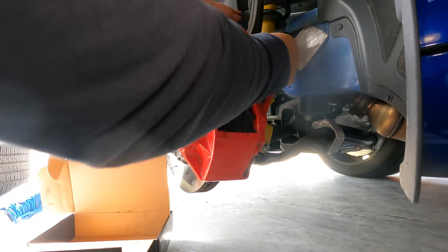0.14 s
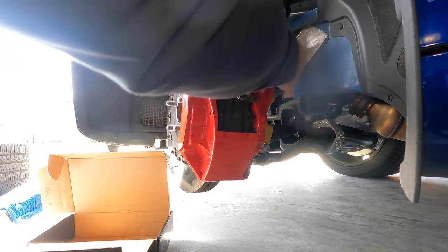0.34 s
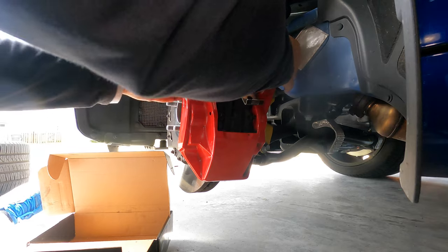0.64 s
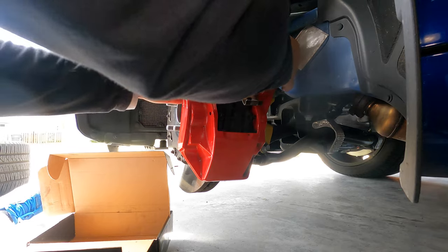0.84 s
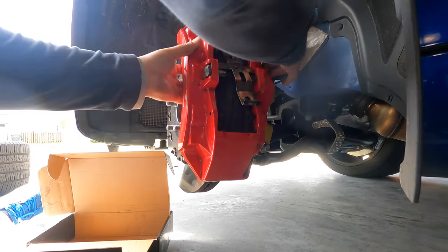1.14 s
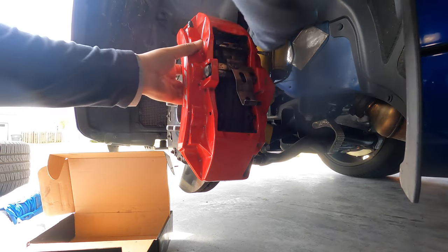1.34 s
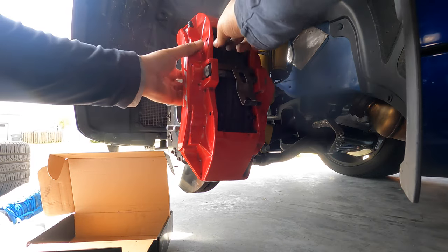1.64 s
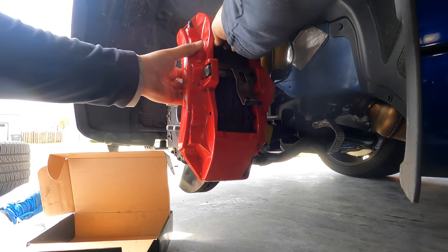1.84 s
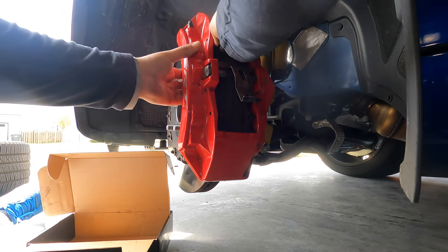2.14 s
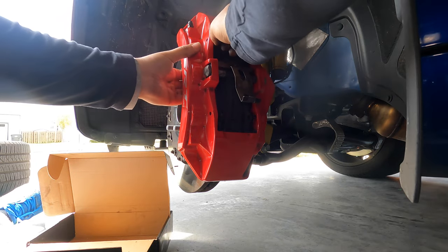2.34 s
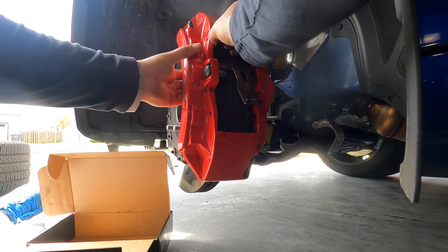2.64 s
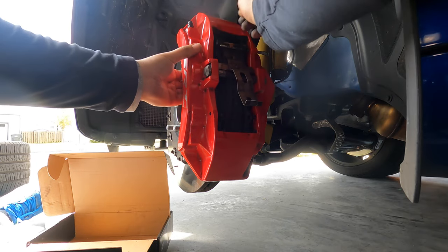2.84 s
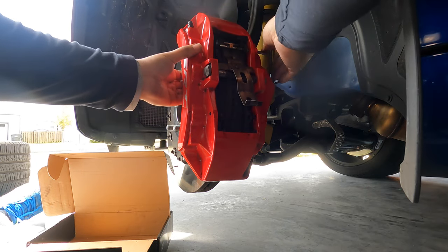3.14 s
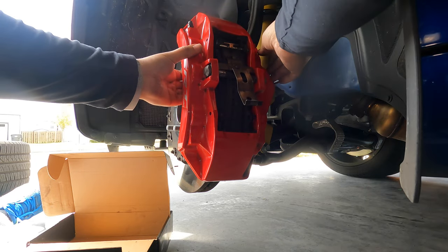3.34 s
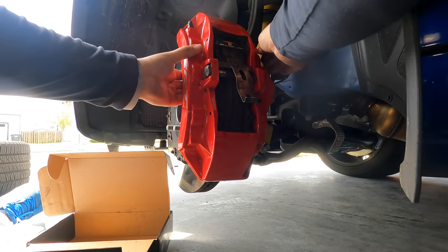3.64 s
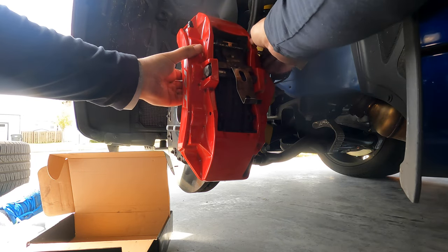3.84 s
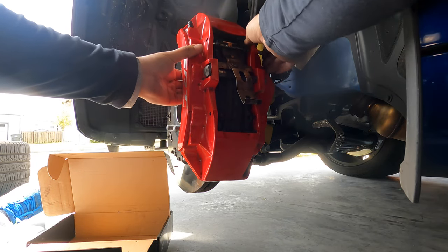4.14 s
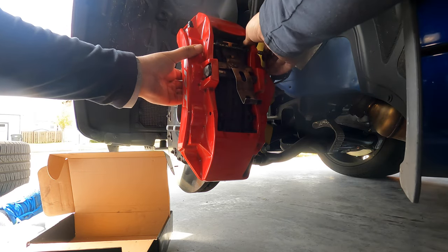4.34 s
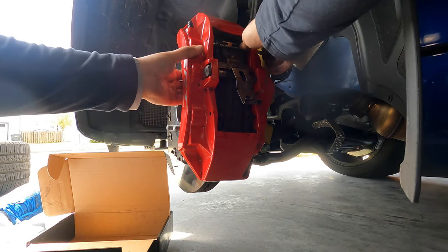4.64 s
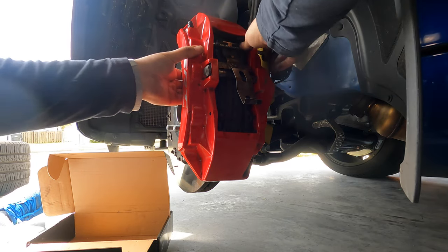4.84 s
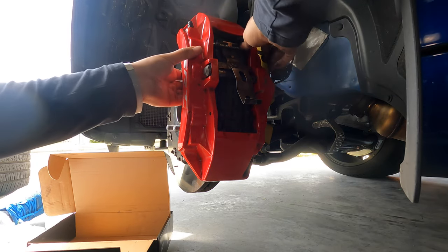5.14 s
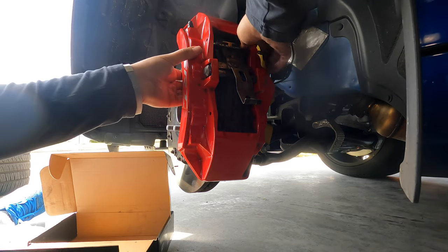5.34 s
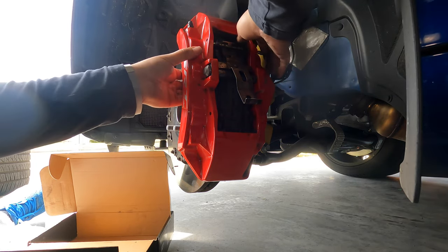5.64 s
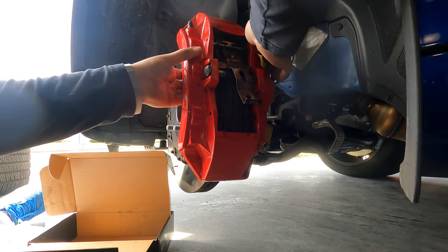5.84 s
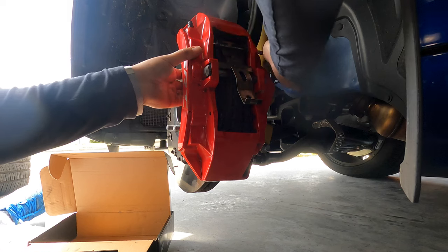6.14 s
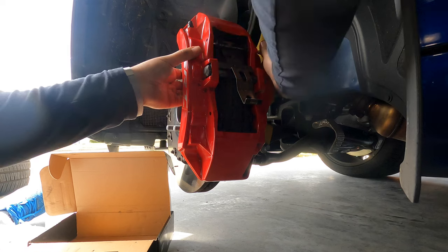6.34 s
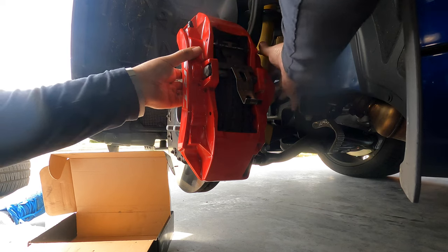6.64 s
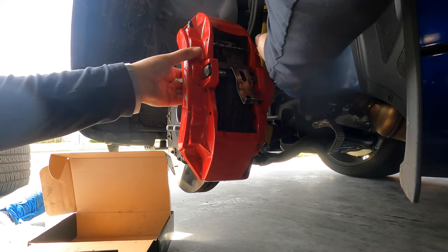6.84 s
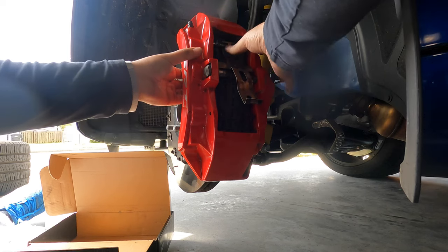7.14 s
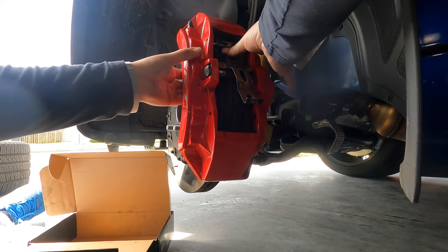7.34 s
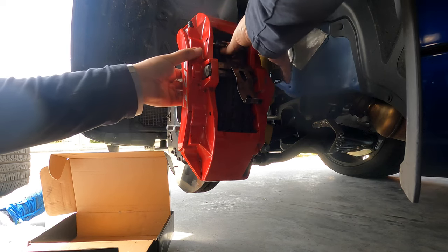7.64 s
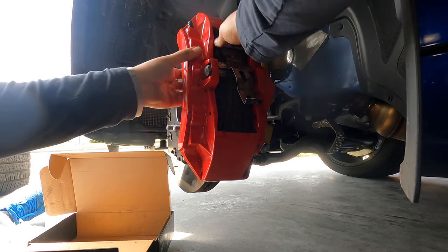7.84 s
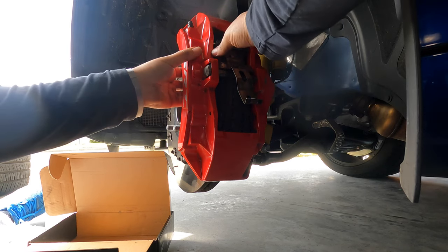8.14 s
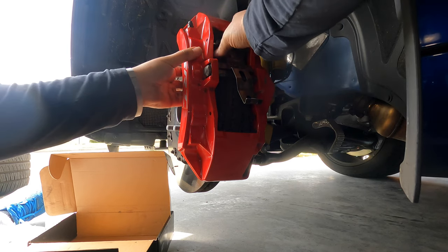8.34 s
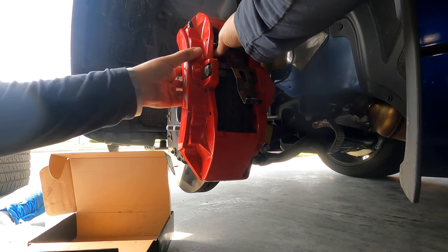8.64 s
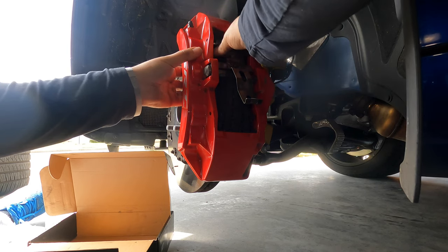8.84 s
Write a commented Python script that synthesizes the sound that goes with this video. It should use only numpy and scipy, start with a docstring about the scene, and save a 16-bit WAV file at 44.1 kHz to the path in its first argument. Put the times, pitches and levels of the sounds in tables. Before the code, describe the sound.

Close metallic work on a brake caliper in an open, echoing garage, over soft low rumble, a distant airy rush and a wavering low motor hum. A faint tick at 0.3 s leads into grating clacks from 0.45 to 0.75 s, loudest near 0.57, with thin steel ringing. A light scuff follows at 0.9, taps at 1.4 and 1.6, a crisp double click around 2.28, small clicks at 2.5 and 2.9. The hum stops by about 2.7. Sharp knocks and clinks burst out at 3.73-3.92, the last hardest, with a smaller click at 4.19; the rush sinks away. Very faint thin whistles pass at 4.2 and 4.8. A stuttering, gritty rasp runs 5.2-5.5, then tiny ticks fade to 5.9. Sparse faint taps and scuffs continue, with a clear tap at 6.97, dull plastic bumps with cloth rub at 7.2 and 7.4, and a final bright click at 7.9. Then only faint rumble and drone.

```python
"""Brake pads and a retaining pin are worked into a caliper under a wheel arch, in an open garage.
Each contact is a noisy push that grates or cracks; firm ones ring pad, pin, clip and suspension as modes.
A part rasps along an edge in noise bursts, an arm bumps the arch liner in coloured noise, thin tones whistle.
The arch and garage echo the work; behind lie noise rumble, a distant rush that sinks away, a hum that stops
and a faint steady drone."""
import sys
import numpy as np
from scipy import signal
from scipy.fft import rfft, irfft
from scipy.io import wavfile
from scipy.ndimage import uniform_filter1d

SR = 44100
rng = np.random.default_rng(int(sys.argv[2]) if len(sys.argv) > 2 else 0)


def digitize_waveform(pressure):
    """Quantize a signal to 16-bit integers and store it at the path in sys.argv[1].

    Rows of a 2-D input are taken as channels; values are limited to [-1, 1].
    """
    field = np.atleast_2d(pressure).T
    bounded = np.clip(field, -1, 1)
    quanta = np.round(bounded * 32767).astype(np.int16)
    wavfile.write(sys.argv[1], SR, quanta)


N = 396018
T = np.arange(N) / SR
LEAD_S = 0.1  # room for a contact's rise ahead of its peak

# the dull crack of a light touch, relative levels: frequency_hz [Hz], density_db [dB per Hz]
TICK = [(100, -28), (550, -7), (1000, -1.5), (2200, 3.5), (3400, -1.5), (4400, -5), (6800, -10),
        (8000, -27.5), (10300, -18.5), (12500, -34), (15000, -40.5)]


def clinks(strut_db=-33, spring_db=-23.5, grip_s=0.011):
    """Firm contacts also set the pin, the spring clip and the suspension ringing, until the fingers mute them."""
    # firm metal contacts; rings are relative to the contact's level, the pad's before a common lift:
    # peak_s [s], level_db [dB], rise_ms [ms], fall_ms [ms], pad_ring_db [dB], pin_ring_db [dB], spot_hz [Hz]
    contacts = [ (.449, -19, 7.8, 23, -10, -22.5, 2184), (.485, -21.5, 4, 7.2, 2.5, -26.5, 5870),
                (.494, -26, 2, 9, -2.5, -24.5, 4840), (.549, -35, 3.2, 24, 0.5, -3, 5020),
                (.572, -11.5, .4, 11.8, -12, -29, 3627), (.598, -36, 2.1, 85, -8.5, -15, 2280),
                (.716, -33.5, 15, 31, -6.5, -21, 1560), (.742, -40.5, 3, 3.5, 5, -13.5, 3330),
                (1.968, -57.5, 0.9, 4, 7, -25, 3190), (2.265, -40.5, 1.7, 7.7, 3, -16, 3360),
                (2.282, -26.5, 0.87, 3.4, 2, -28, 3100), (2.2894, -24.5, .8, 4.1, -8, -19.5, 1804),
                (2.604, -41.5, 1.5, 5.6, -1, -16, 3353), (2.917, -32.5, 2, 11, -5, -18, 3850),
                (2.925, -33, 1.2, 2.2, 1.5, -22, 4640), (3.748, -29, 1.5, 3.4, 0.5, -26, 2190),
                (3.7552, -19.5, 0.34, 3.7, 5.5, -25.5, 3353), (3.765, -17, 1.3, 4.2, -1, -29.5, 2203),
                (3.9, -22, 1.3, 5.8, -1, -27, 4200), (3.9087, -11, 0.33, 3.3, -9.5, -23.5, 3804),
                (3.9165, -22.5, .5, 4.1, -8.5, -23.5, 2312), (4.181, -39, 0.62, 3.6, -2.5, -23, 3353),
                (4.1864, -29.5, 0.55, 2.4, -6, -32, 3780), (4.674, -39, 0.44, 3.4, -13, -29, 3300),
                (5.681, -56, 0.96, 7.2, -3, -28, 3440), (6.178, -49, 1.1, 11.5, -19, -19, 3790),
                (7.164, -45, 1.6, 11, -8, -10, 5070), (7.897, -28, 1.35, 1.6, -7, -28, 6170),
                (7.918, -39, 2.6, 3.9, -7, -23, 3470)]
    # crack of a firm contact, relative levels: frequency_hz [Hz], density_db [dB per Hz]
    crack_colour = [(100, -24), (550, -14), (900, -3.5), (1400, -6.5), (2300, 2), (2800, -2.5), (3500, 2),
                    (4300, -2.5), (5400, -6.5), (6100, -4.5), (7800, -19.5), (10300, -19), (12500, -39),
                    (15000, -44.5)]
    # ringing parts, relative levels, in each: frequency_hz [Hz], level_db [dB], t60_s [s]
    pin_modes = [(2295, -9, 0.26), (2710, -16.5, 0.67), (5020, 6, 0.32), (6660, -19, 0.18),
                 (9000, -31.5, 0.16), (11970, -26, 0.14), (12150, -29, .13)]  # the thin steel pin
    spring_modes = [(2450, -14, .25), (3670, -14, .3), (4120, -14, .28), (6260, 0.5, 0.36),
                    (7538, -13.5, 0.36), (11000, -26, .25), (11900, -21, 0.22), (12340, -24.5, .2)]  # the spring clip
    strut_modes = [(172.3, -4.5, 0.26), (195.5, -2.5, 0.84), (233, 0, 0.34), (283, -5.5, .3),
                   (333, -4, 0.44)]  # the suspension behind the caliper
    # moments when the fingers press on the ringing steel: grip_s [s]
    grips = [.565, 2.96, 3.893, 4.28]
    # level and fall time that leave the colour untilted
    neutral_db, neutral_ms = -22, 6
    brighten = 0.11  # dB/octave gained per dB of level
    dulling_db = 0.9  # dB/octave lost per doubling of the fall time
    out = np.zeros(N)
    for s, db, rise_ms, fall_ms, pad_db, pin_db, spot_hz in contacts:
        harder = brighten * (db - neutral_db)
        longer = dulling_db * np.log2(fall_ms / neutral_ms)
        force, sound = contact(crack_colour, rise_ms, fall_ms, harder - longer, pad_db)
        # a longer push moves the heavy suspension more
        thump_db = strut_db + 10 * np.log10(2 * rise_ms + fall_ms)
        sound = sound + ring(force, spot_mode(spot_hz))
        for modes, ring_db in (pin_modes, pin_db), (spring_modes, spring_db), (strut_modes, thump_db):
            sound = sound + undb(ring_db) * ring(force, modes)
        next_grip = min([g for g in grips if g > s], default=T[-1])
        clock = s - LEAD_S + np.arange(len(sound)) / SR
        held = np.maximum(clock - next_grip, 0)
        add(out, s - LEAD_S, undb(db) * sound * np.exp(-held / grip_s))
    return out


def contact(spectrum, rise_ms, fall_ms, bright_db, pad_db, grit_db=1.6, snap=6.3, snap_ms=0.56,
            casting_db=-2, casting_t60=0.042, crack_db=-0.5, pad_lift_db=5.0):
    """Steel grates up to a peak and chatters out: the force, and the crack and short rings that it makes."""
    # the pad's backing plate, damped by its lining, relative levels:
    # frequency_hz [Hz], level_db [dB], t60_s [s]
    pad_modes = [(1123, -20, 0.04), (1800, -20.5, 0.079), (2237, -13.5, 0.13), (3320, -5.5, 0.11),
                 (3355, 2, 0.021), (3430, -5.5, 0.041), (3680, -13.5, 0.055), (4060, -19, 0.04),
                 (5933, -15.5, 0.041), (7020, -23.5, 0.13), (10650, -28, 0.048), (11900, -33, .035)]
    ms = 1000 * (np.arange(30000) / SR - LEAD_S)
    log_force = np.where(ms < 0, -0.5 * (ms / rise_ms) ** 2, -ms / fall_ms)
    force = np.exp(np.maximum(log_force, -60))
    # rough faces catch unevenly, about once a millisecond
    catches = np.repeat(rng.standard_normal(len(ms) // 40), 40)
    grit = unit(undb(grit_db * catches))
    push = force * grit * rng.standard_normal(len(ms))
    # an abrupt contact starts with one hard impact
    push[int(LEAD_S * SR)] -= snap * np.exp(-rise_ms / snap_ms)
    crack = colour(push, spectrum, bright_db)
    # each spot of the caliper casting answers with its own set of short modes
    hz = 1000 + 440 * (np.arange(16) + rng.random(16))
    mode_db = between(hz, spectrum) + bright_db * np.log2(hz / 3000)
    mode_db = mode_db - 10 * np.log10(np.sum(undb(mode_db) ** 2))
    casting = ring(force, [(f, db, casting_t60) for f, db in zip(hz, mode_db)])
    # the pad's pitch shifts a little with how it is wedged
    wedged = np.array(pad_modes) * [1 + 0.004 * rng.standard_normal(), 1, 1]
    pad = ring(force, wedged)
    sound = undb(crack_db) * crack + undb(casting_db) * casting + undb(pad_db + pad_lift_db) * pad
    return force, sound


def spot_mode(hz, level_db=-2.5, cycles=210):
    """The mode that a struck spot brings out dies by 60 dB in a set number of cycles, so higher ones die sooner."""
    return [(hz, level_db, cycles / hz)]


def taps(rise_ms=0.3, pad_db=-16.5, spot_db=-3):
    """Light taps on parts held still by the fingers: only the casting, the pad and the struck spot answer."""
    # peak_s [s], level_db [dB], fall_ms [ms], brightness_db [dB/octave], spot_hz [Hz]
    touches = [(.305, -48.5, 5, 0.5, 5300), (1.385, -36, 3.8, 0, 3360), (1.626, -41, 16, -4.5, 2170),
               (2.467, -42, 5.2, 0, 3280), (3.577, -51, 8, 2.5, 3350), (3.733, -30, 2.1, 2.5, 3900),
               (5.518, -36.5, 4, -2, 3880), (5.833, -51.5, 6.1, 1.5, 2180), (6.146, -44.5, 16, -3, 2220),
               (6.213, -43.5, 7, -5, 2575), (6.468, -50, 7, 8.5, 7170), (6.9699, -25, 2.6, -3, 2390),
               (7.065, -50, 5.6, 0, 6060), (7.411, -36, 2.4, -3, 2270)]
    out = np.zeros(N)
    for s, db, fall_ms, bright_db, spot_hz in touches:
        force, sound = contact(TICK, rise_ms, fall_ms, bright_db, pad_db, casting_db=-7.5)
        spot = undb(spot_db) * ring(force, spot_mode(spot_hz))
        add(out, s - LEAD_S, undb(db) * (sound + spot))
    return out


def scuffs(fade_ratio=1.76, pad_db=-11.5):
    """Metal sliding lightly on metal swells, then fades over a time in proportion to the swell."""
    # peak_s [s], level_db [dB], swell_ms [ms], brightness_db [dB/octave]
    slides = [(.865, -43.5, 42, -5), (1.355, -49.5, 24.5, 3), (3.285, -53.5, 23, 1.5), (3.72, -40, 6, 1.5),
              (6.409, -51.5, 9, -1.5), (6.831, -49.5, 28, 0.5), (6.953, -43.5, 6.6, -10),
              (7.503, -40, 9, -3.5)]
    out = np.zeros(N)
    for s, db, swell_ms, bright_db in slides:
        _, sound = contact(TICK, swell_ms, fade_ratio * swell_ms, bright_db, pad_db)
        add(out, s - LEAD_S, undb(db) * sound)
    return out


def rasp(slip_db=-4.5, lesser_db=5.0, scatter_db=0.5, snap=2.8, grain_db=3):
    """A part dragged over an edge sticks and slips, harder as it is pressed, with fine grating in between."""
    # strokes along the edge, levels before colouring: full_pressure_s [s], hold_s [s], level_db [dB]
    strokes = [(4.778, 0.036, -55.5), (4.845, 0.3, -61), (5.283, 0.13, -37)]
    # the hardest slips, before slip_db and colouring: slip_s [s], level_db [dB]
    slips = [(5.2515, -22), (5.2672, -26.5), (5.2755, -23.5), (5.3489, -17), (5.3748, -22.5),
             (5.3936, -19.5), (5.4439, -21.5)]
    # the rasp's relative spectrum: frequency_hz [Hz], density_db [dB per Hz]
    rasp_colour = [(240, -19), (400, -2), (1100, -4.5), (1600, 2.5), (2200, 5), (2800, 4), (3500, 5.5),
                   (4200, -2.5), (7100, -9.5), (8800, -21.5), (10300, -17), (12500, -45), (15000, -42)]
    rise_db_per_s, fall_db_per_s = 290, 280
    slip_fall_ms, slip_gap_s = 3.1, 0.012  # the gap is the lesser slips' mean spacing
    pressure = sum(swell(*stroke, rise_db_per_s, fall_db_per_s) for stroke in strokes)
    # lesser slips follow the pressure from the last stroke on
    start, _, _ = strokes[-1]
    chance = rng.standard_normal((16, 2))
    times = start + slip_gap_s * (np.arange(len(chance)) + 0.3 * chance[:, 0])
    sizes = np.interp(times, T, pressure) * undb(lesser_db + scatter_db * chance[:, 1])
    hardest = [(s, undb(db + slip_db)) for s, db in slips]
    grain = unit(rng.standard_normal(N) * undb(grain_db * walk(700)))
    pushes = pressure * grain
    ms = 1000 * np.arange(2000) / SR
    for s, size in hardest + list(zip(times, sizes)):
        slip = np.exp(-ms / slip_fall_ms) * rng.standard_normal(len(ms))
        slip[0] = -snap
        add(pushes, s, size * slip)
    return colour(pushes, rasp_colour)


def settling(count=8, rise_ms=4, fall_ms=11, bright_db=-3, scatter_db=2, pad_db=-10):
    """After the rasp the part finds its seat in uneven small ticks, each of its own colour, growing fainter."""
    start_s, gap_s, start_db, fade_db_per_s = 5.556, 0.042, -47.5, 29
    out = np.zeros(N)
    for k, (shift, strength, tint) in enumerate(rng.standard_normal((count, 3))):
        after = gap_s * (k + 0.17 * shift)
        db = start_db - fade_db_per_s * after + scatter_db * strength
        _, sound = contact(TICK, rise_ms, fall_ms, bright_db + scatter_db * tint, pad_db)
        add(out, start_s + after - LEAD_S, undb(db) * sound)
    return out


def arm(flutter_db=1.0):
    """The arm leans on the plastic liner, which booms while the sleeve rubs along it."""
    # bumps on the liner: full_s [s], boom_db [dB], rub_db [dB]
    bumps = [(7.198, -41, -56.5), (7.396, -32.5, -42)]
    # relative spectra, in each: frequency_hz [Hz], density_db [dB per Hz]
    liner_colour = [(24, -52.5), (40, -19.5), (92, -5.5), (193, 0), (220, 0), (357, -5), (434, -12),
                    (521, -13), (650, -22), (900, -13), (1170, -46), (1980, -120)]  # the booming plastic
    sleeve_colour = [(300, -2.5), (600, 3), (1500, 3), (2500, -3.5), (4000, -9.5), (6500, -24.5),
                     (8500, -47), (14000, -57)]  # the rubbing cloth
    rise_db_per_s, hold_s = 1402, 0.02
    boom_fall_db_per_s, rub_fall_db_per_s = 70, 40.5
    boom = sum(swell(s, hold_s, db, rise_db_per_s, boom_fall_db_per_s) for s, db, _ in bumps)
    rub = sum(swell(s, hold_s, db, rise_db_per_s, rub_fall_db_per_s) for s, _, db in bumps)
    flutter = undb(flutter_db * walk(90))
    return boom * noise(liner_colour) + rub * flutter * noise(sleeve_colour)


def whistles(waver_hz=60):
    """Faint sine tones glide and waver in pitch while they swell and fade."""
    # start_s [s], length_s [s], start_hz [Hz], end_hz [Hz], peak_db [dB]
    tones = [(4.225, 0.11, 3710, 3600, -63), (4.249, .3, 4330, 4340, -70.5), (4.816, 0.33, 2890, 3100, -64)]
    out = np.zeros(N)
    for s, length, start_hz, end_hz, db in tones:
        along = np.clip((T - s) / length, 0, 1)
        hz = start_hz + (end_hz - start_hz) * along + waver_hz * walk(60)
        out += undb(db) * np.sin(np.pi * along) * np.sin(2 * np.pi * np.cumsum(hz) / SR)
    return out


def echoes(dry, arch_db=-12, arch_t60=0.11, room_db=-14, build_s=0.0026):
    """Quick reflections inside the wheel arch, then the garage's longer tail, as decaying noise."""
    # the garage's decay: frequency_hz [Hz], t60_s [s]
    room_decay = [(150, 0.19), (500, 1), (1500, 0.39), (3500, 0.43), (7000, .45), (13000, 0.44)]
    t = np.arange(SR) / SR
    hz = np.fft.rfftfreq(SR, 1 / SR)
    white, tail = rfft(rng.standard_normal(SR)), 0
    centres, t60s = np.transpose(room_decay)
    # overlapping bands, each dying at its own rate
    for share, t60 in zip(np.eye(len(centres)), t60s):
        band = irfft(white * between(hz, np.c_[centres, share]), SR)
        tail = tail + band * np.exp(-np.log(1000) * t / t60)
    tail = tail * (1 - np.exp(-t / build_s))
    arch = rng.standard_normal(SR) * np.exp(-np.log(1000) * t / arch_t60) * (t > 0.002)
    response = (undb(arch_db) * unit(arch) + undb(room_db) * unit(tail)) / np.sqrt(SR)
    return signal.fftconvolve(dry, response)[:N]


def background(rumble_db=-49, waver_db=0.13, hum_waver_db=1.5, drone_hz=139.0, drone_db=-56):
    """Noise rumble through the open door, a distant noise rush, a wavering motor hum and a fainter drone."""
    # relative spectra, in each: frequency_hz [Hz], density_db [dB per Hz]
    garage_colour = [(15, -40.5), (25, -19), (64, -10.5), (86, -5.5), (257, -4.5), (326, -16.5), (415, -15),
                     (450, -19.5), (621, -17.5), (729, -23), (856, -24), (2930, -36), (3630, -38),
                     (4380, -38.5), (15000, -69.5)]  # the rumble
    rush_colour = [(60, 3.5), (220, 12), (450, -2.5), (800, -1), (1050, -2), (1220, 4), (1500, -1.5),
                   (2200, -0.5), (2800, -7.5), (4000, -17.5), (7000, -38.5), (14000, -52.5)]  # the distant rush
    # the rush's level: time_s [s], level_db [dB]
    rush_course = [(0, -49.5), (1, -46.5), (2.2, -45), (3, -47), (3.7, -47.5), (4, -52.5), (4.3, -58),
                   (9, -63)]
    # the motor hum, which stops: time_s [s], pitch_hz [Hz], level_db [dB rms]
    hum_course = [(0, 104.4, -51.5), (1, 103.3, -50), (1.6, 106, -49), (2.25, 107.3, -45.5),
                  (2.5, 106.5, -54), (2.8, 101, -84)]
    rumble = undb(rumble_db + waver_db * walk(6)) * noise(garage_colour)
    rush_db, = curves(rush_course)
    rush = undb(rush_db + waver_db * walk(9)) * noise(rush_colour)
    hum_hz, hum_db = curves(hum_course)
    hum_phase = 2 * np.pi * np.cumsum(hum_hz + 0.71 * walk(4.1)) / SR
    hum = undb(hum_db + hum_waver_db * walk(6.4)) * np.sin(hum_phase)
    drone_phase = 2 * np.pi * np.cumsum(drone_hz + 1.5 * walk(12.0)) / SR
    drone = undb(drone_db + walk(1.3)) * np.sin(drone_phase)
    # a sine of rms 1 peaks at the root of two
    return rumble + rush + np.sqrt(2) * (hum + drone)


def undb(db):
    """Decibels to gain."""
    return 10 ** (np.asarray(db) / 20)


def unit(x):
    """Scale to rms 1."""
    return x / np.sqrt(np.mean(x ** 2))


def curves(rows):
    """Each column after the first as a line through time."""
    s, *columns = np.transpose(rows)
    return [np.interp(T, s, c) for c in columns]


def between(hz, points):
    """Read (Hz, value) points on a log-frequency axis."""
    f, value = np.transpose(points)
    return np.interp(np.log(hz + 1), np.log(f), value)


def colour(x, points, tilt_db=0):
    """Give a sound a spectrum, tilted in dB/octave about 3 kHz; white noise keeps its power."""
    hz = np.fft.rfftfreq(len(x), 1 / SR)
    octaves = np.log2(np.clip(hz, 500, 12000) / 3000)
    gain = unit(undb(between(hz, points) + tilt_db * octaves))
    return irfft(rfft(x) * gain, len(x))


def noise(points):
    """Coloured noise of rms near 1."""
    return colour(rng.standard_normal(N), points)


def walk(rate):
    """Smooth random wandering of rms near 1, with a new target rate times a second."""
    k = int(SR / rate)
    steps = np.repeat(rng.standard_normal(N // k + 1), k)
    return unit(uniform_filter1d(steps, k)[:N])


def swell(s, hold_s, db, rise_db_per_s, fall_db_per_s):
    """Gain that climbs to a level at time s, holds it and dies away."""
    before, after = np.maximum(s - T, 0), np.maximum(T - s - hold_s, 0)
    return undb(db - rise_db_per_s * before - fall_db_per_s * after)


def ring(force, modes, scatter_db=0.3):
    """Modes gather energy while a force acts and lose it at their own rates."""
    t, out = np.arange(len(force)) / SR, 0
    power = force ** 2 / np.sum(force ** 2)
    for hz, db, t60 in modes:
        keep = np.exp(-2 * np.log(1000) / (t60 * SR))
        energy = signal.lfilter([1], [1, -keep], power)
        gain = undb(db + scatter_db * rng.standard_normal())
        out = out + gain * np.sqrt(energy) * np.sin(2 * np.pi * (hz * t + rng.random()))
    return out


def add(track, s, sound):
    """Mix a sound into a track at time s."""
    i = max(int(s * SR), 0)
    track[i:i + len(sound)] += sound[:max(N - i, 0)]


def scene():
    """The work at the caliper, its echoes and the background."""
    work = clinks() + taps() + scuffs() + rasp() + settling() + arm() + whistles()
    return (work + echoes(work) + background())[None]


def record(dry, top_hz=15100):
    """A small microphone: its port notches the treble, the loudest peaks are rounded and the top is cut."""
    # the port's narrow dip: centre_hz [Hz], width_hz [Hz], depth_per_pass [0-1]
    port_dip = (9120, 550, .85)
    hz, width_hz, depth = port_dip
    for _ in range(2):
        dry = dry - depth * signal.lfilter(*signal.iirpeak(hz, hz / width_hz, fs=SR), dry)
    rounded = dry / (1 + dry ** 4) ** 0.25
    top_cut = signal.ellip(10, 0.2, 80, top_hz, fs=SR, output="sos")
    return signal.sosfilt(top_cut, rounded)


dry = scene()
out = record(dry)
digitize_waveform(out)
```